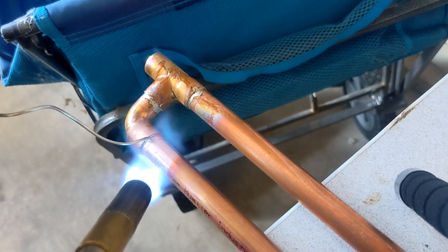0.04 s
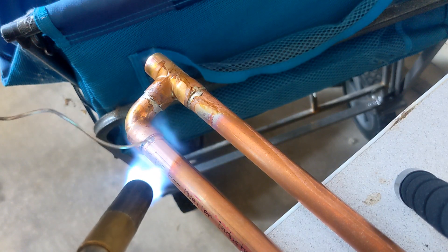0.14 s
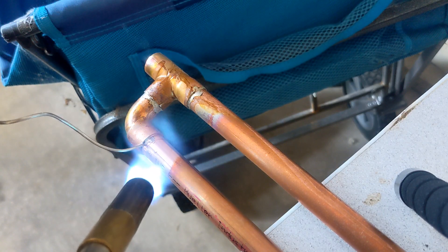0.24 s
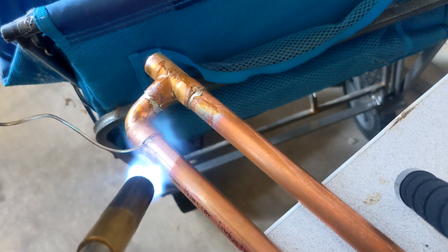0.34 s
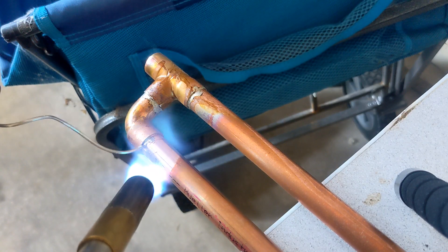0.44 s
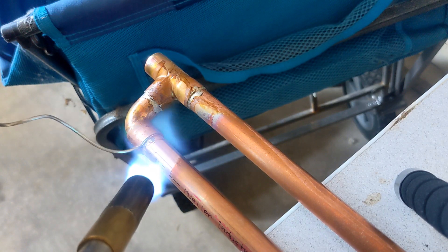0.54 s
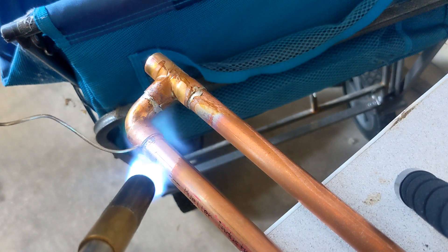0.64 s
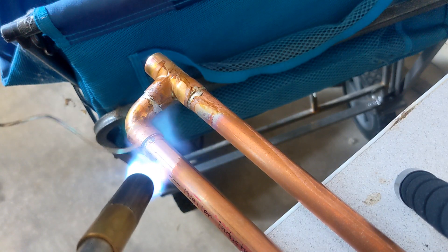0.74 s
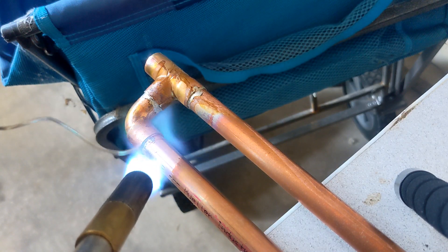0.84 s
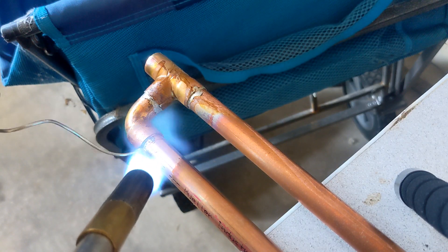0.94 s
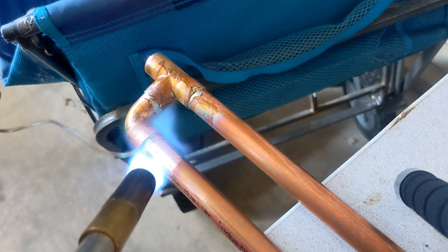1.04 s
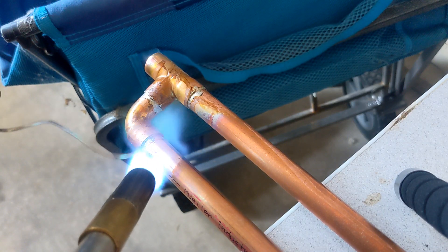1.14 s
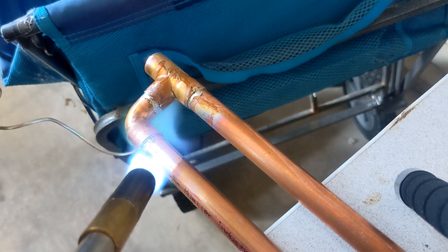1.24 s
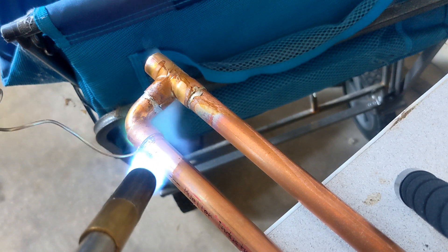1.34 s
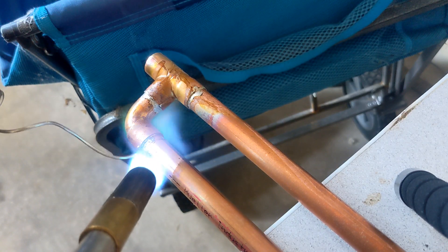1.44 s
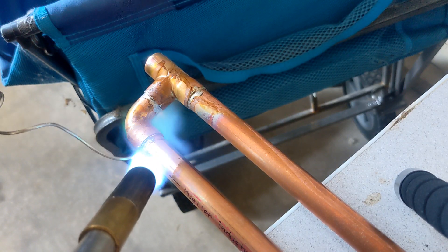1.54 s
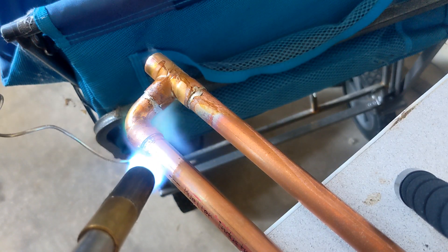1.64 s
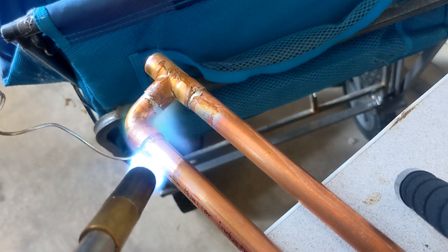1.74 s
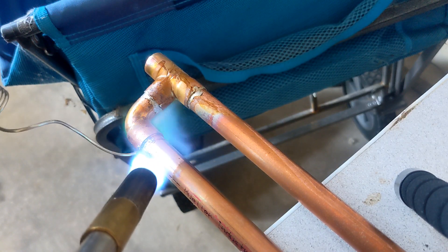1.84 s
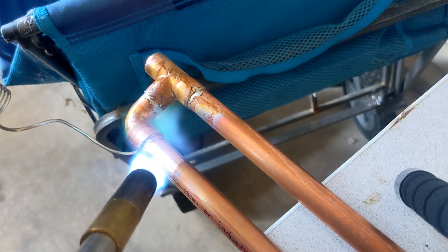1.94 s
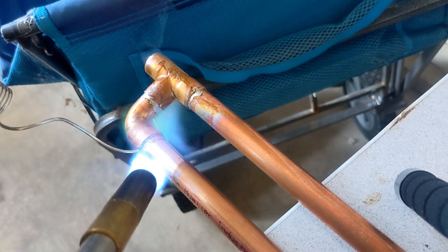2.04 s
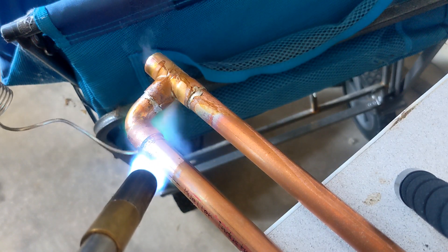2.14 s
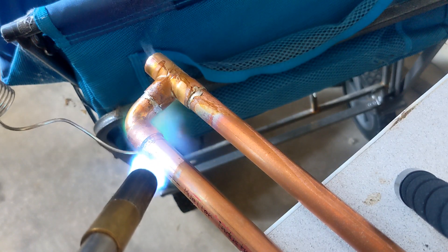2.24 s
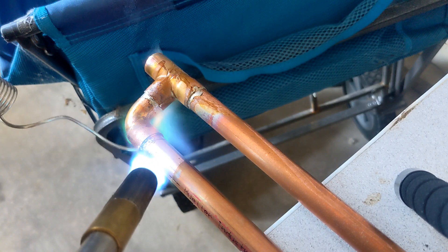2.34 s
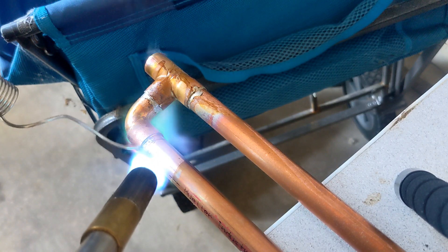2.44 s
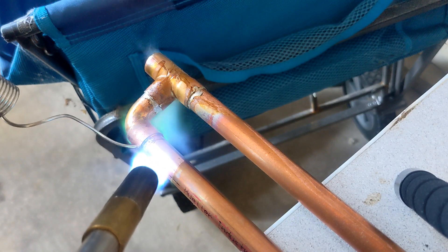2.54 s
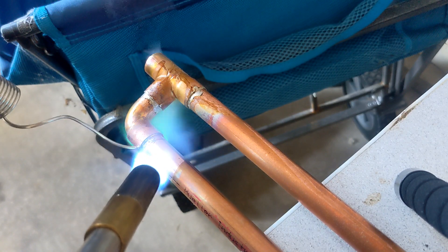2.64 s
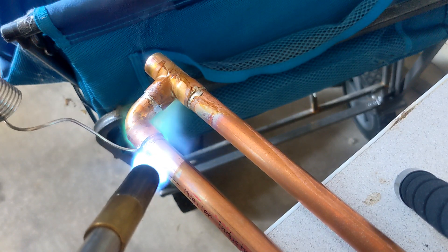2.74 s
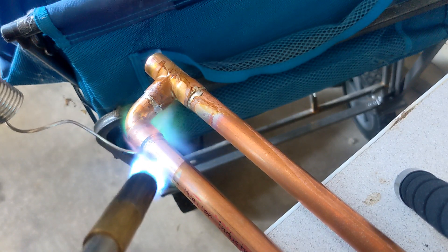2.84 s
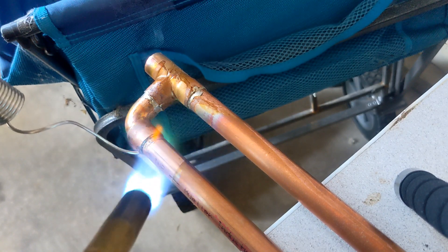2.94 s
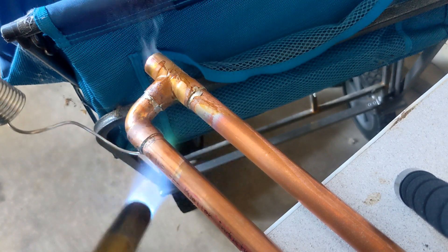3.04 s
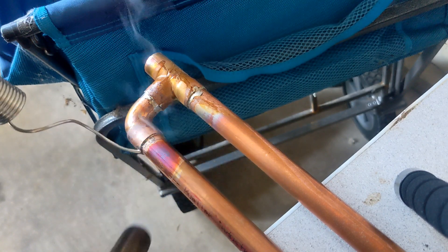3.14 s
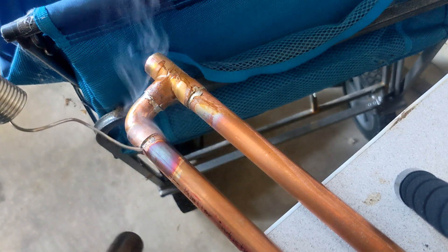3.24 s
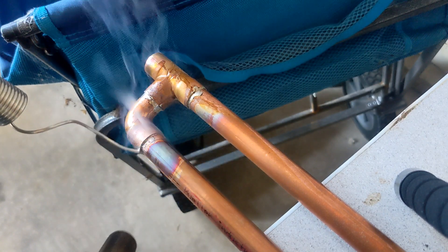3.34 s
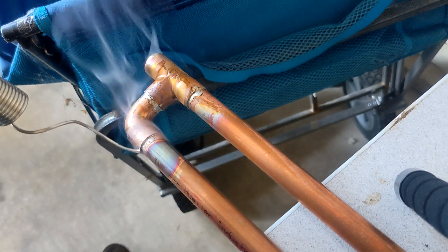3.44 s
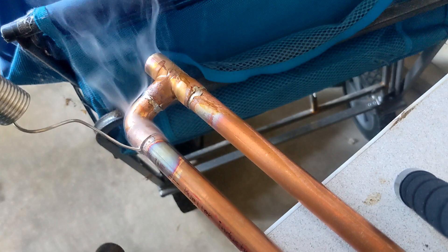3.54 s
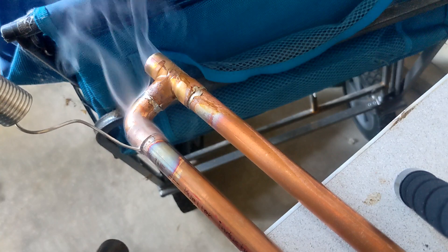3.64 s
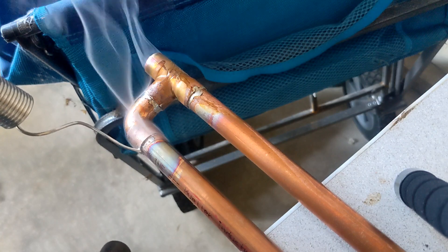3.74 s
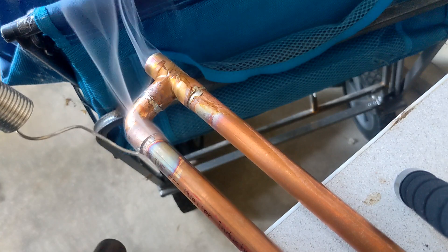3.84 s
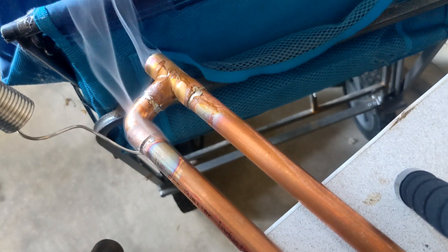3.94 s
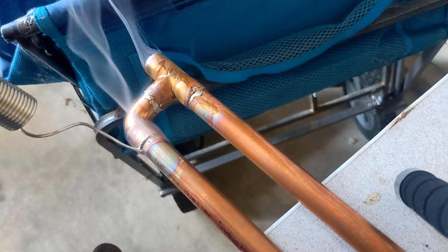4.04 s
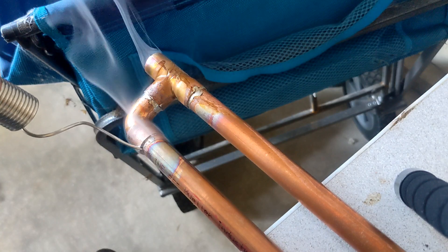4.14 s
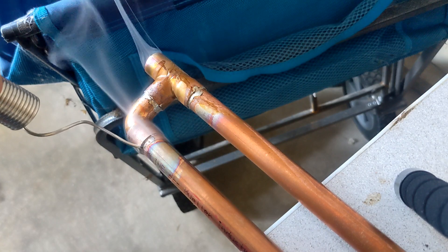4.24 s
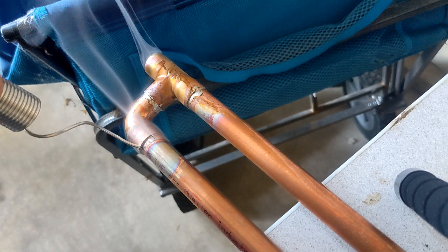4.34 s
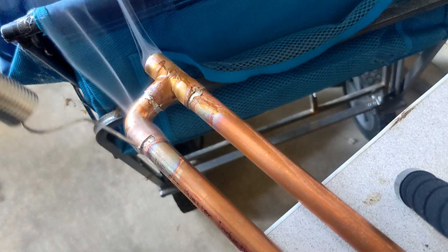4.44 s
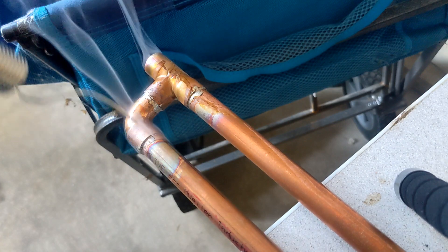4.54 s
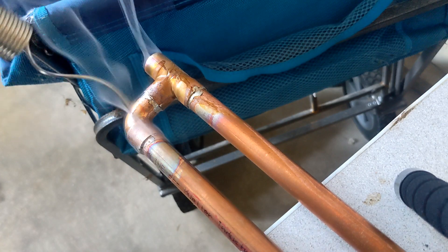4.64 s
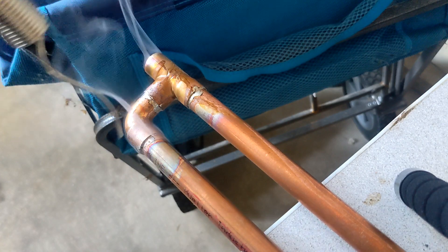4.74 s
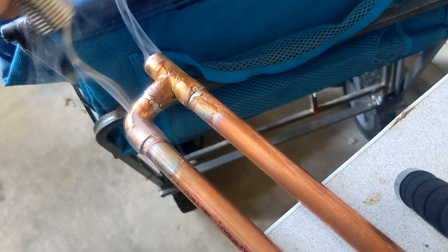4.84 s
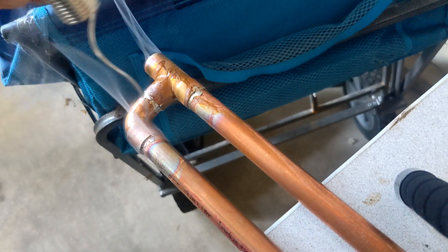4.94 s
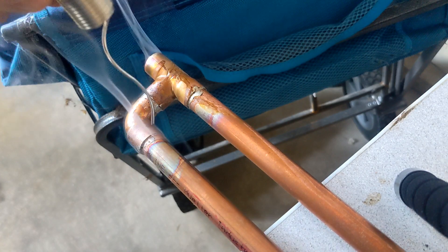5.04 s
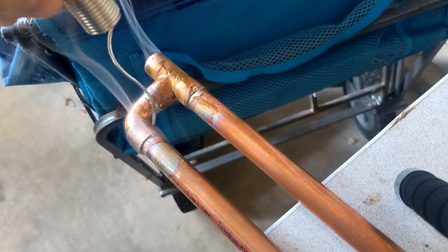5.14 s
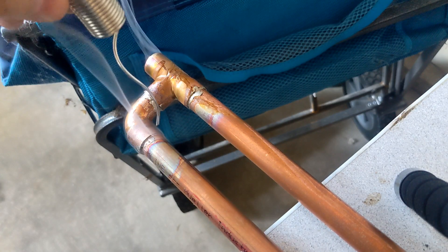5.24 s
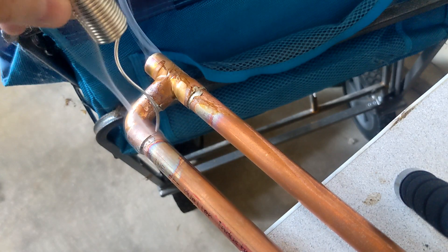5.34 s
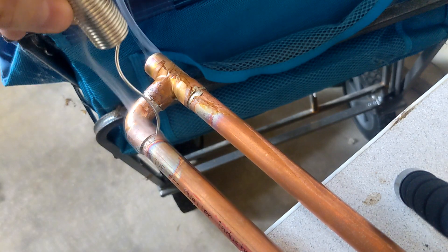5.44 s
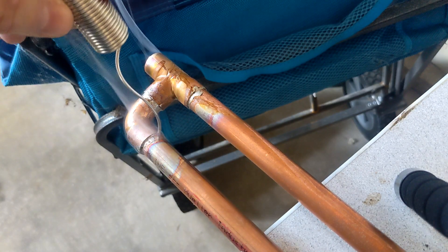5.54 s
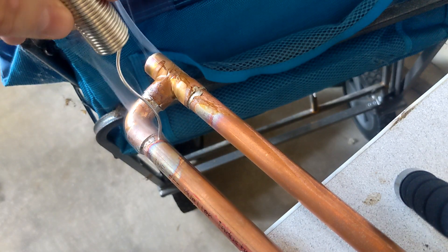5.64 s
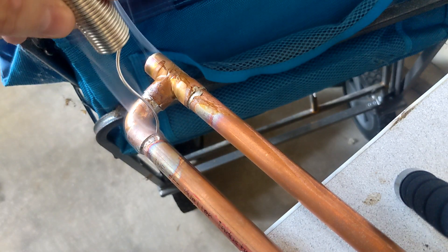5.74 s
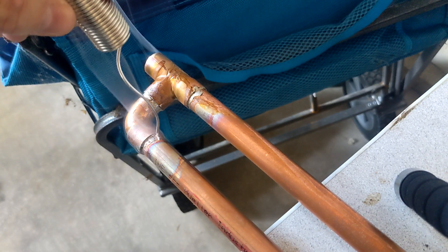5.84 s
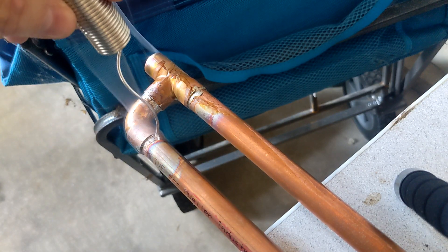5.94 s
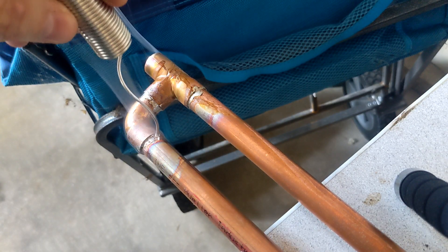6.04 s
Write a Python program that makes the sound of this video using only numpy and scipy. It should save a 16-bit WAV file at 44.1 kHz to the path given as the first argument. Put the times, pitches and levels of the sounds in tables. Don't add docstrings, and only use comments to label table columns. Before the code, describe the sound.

A handheld gas torch burns close to the microphone with a loud, rough, steady roar in a garage. After three seconds the gas dies away quickly with a small valve click, then two hard plastic trigger snaps follow, a thin spring ringing after them. Only a low compressor hum and faint room air remain, with one tiny tick of a wire spool near the end.

```python
import sys
import numpy as np
from scipy import signal
from scipy.fft import rfft, irfft, next_fast_len
from scipy.io import wavfile
from scipy.ndimage import uniform_filter1d

SR = 44100
rng = np.random.default_rng(int(sys.argv[2]) if len(sys.argv) > 2 else 0)


def undo_db(level):
    steps = np.asarray(level, float) / 20
    return 10 ** steps


def materialize(psi):
    bounded = np.clip(np.atleast_2d(psi).T, -1, 1)
    quanta = np.round(bounded * 32767).astype(np.int16)
    wavfile.write(sys.argv[1], SR, quanta)


N = 267907


def evened(x):
    return x / np.sqrt(np.mean(x ** 2) + 1e-20)


def read(points, hz):
    f, value = np.transpose(points)
    return np.interp(np.log(hz + 1), np.log(f + 1), value)


def drift(rate_hz, count):
    t = np.arange(0, N + 256, 256) / SR
    f = np.geomspace(rate_hz / 20, rate_hz, num=24)
    phase = rng.random((count, 24, 1))
    waves = np.sin(2 * np.pi * (f[:, None] * t + phase)) / np.sqrt(f)[:, None]
    slow = waves.sum(axis=1)
    return np.array([np.interp(np.arange(N) / SR, t, evened(v)) for v in slow])


def port_pair(noise, same, left_db, right_db, lead):
    shared, other = rfft(noise)
    same = np.clip(same, 0, 1)
    right = same * shared * np.exp(1j * lead) + np.sqrt(1 - same ** 2) * other
    return irfft(np.array([shared * undo_db(left_db), right * undo_db(right_db)]), noise.shape[1])[:, :N]


def colour_db(spectrum, peaks, hz):
    narrow_db = sum(db / (1 + (2 * (hz - f) / width) ** 2) ** 1.15 for f, width, db in peaks)
    return read(spectrum, hz) + narrow_db


def scatter(pair, wet_db, t60, dull_hz):
    taps = np.zeros((2, 22 * 600))
    at = np.arange(0, taps.shape[1], 22) + rng.integers(0, 22, (2, 600))
    np.put_along_axis(taps, at, rng.choice([-1., 1.], at.shape), axis=1)
    t = np.arange(taps.shape[1]) / SR
    taps = taps * undo_db(-60 * t / t60) * (t > .003)
    low = signal.lfilter(*signal.butter(1, 1500, fs=SR), taps)
    taps[1] += low[0] - low[1]
    taps = signal.lfilter(*signal.butter(1, min(dull_hz, SR / 2.2), fs=SR), taps)
    tail = taps / np.linalg.norm(taps[0])
    return pair + undo_db(wet_db) * signal.fftconvolve(pair, tail, axes=1)[:, :N]


def garage_air():
    # f/Hz, level per Hz/dB
    air_left = [(30, -83), (60, -68.5), (100, -69), (170, -65.5), (260, -70), (310, -87.5), (380, -74.5),
                (450, -80.5), (800, -84.5), (1600, -95), (4000, -107), (10500, -118), (13000, -118),
                (15200, -113)]
    air_right = [(30, -85.5), (60, -69.5), (100, -69), (170, -66.5), (260, -68), (310, -78), (400, -78.5),
                 (550, -81.5), (1250, -85.5), (1600, -95.5), (2300, -96.5), (4000, -104), (10500, -117),
                 (15700, -119)]
    # f/Hz, width/Hz, level/dB
    air_bands = [(200, 20, -5.5), (2200, 180, 6.5), (3140, 300, 2.5), (4320, 300, 1), (7190, 1200, 3),
                 (9000, 500, 2.5)]
    # f/Hz, likeness/0-1
    air_same = [(60, 1), (250, 0.95), (420, 1), (800, .5), (1300, 0.6), (2500, 0.6), (15000, 0.2)]
    # f/Hz, lead/radians
    air_lead = [(400, 0), (900, -2), (1500, -1.5), (3000, -2)]
    size = next_fast_len(N)
    hz = np.fft.rfftfreq(size, 1 / SR)
    noise = rng.standard_normal((2, size)) * np.sqrt(SR / 2)
    left_db = colour_db(air_left, air_bands, hz)
    right_db = colour_db(air_right, air_bands, hz)
    pair = port_pair(noise, read(air_same, hz), left_db, right_db, read(air_lead, hz))
    return undo_db(0.24 * drift(5.5, count=1)) * pair


def compressor_hum():
    tone_hz = [58, 76.7, 119.9, 239.9, 276.1, 360.7, 479.6, 599.6, 617, 632.9, 652, 719.6, 784.7, 839,
               992.6, 1232.5]
    # level/dB rms, left over right/dB, left lead/radians, wavering/dB
    tone_rows = [(-56.5, -2, 0, 5.5), (-60, -1.5, 0.097, 8.9), (-51, 0, 0.13, 1.7), (-47, -4, .1, 1.5),
                 (-69, 9.5, 0, 2.3), (-69.5, -3, 0.21, 5.2), (-68, -19, -.8, 6), (-49, -5, -0.69, 0.83),
                 (-57, -7, 0, 1.6), (-47, 0.5, 1.2, 1.3), (-74.5, 4, 0, 3), (-53.5, 3, -0.58, .8),
                 (-83, 9.5, 0, 2), (-77, 10, 0, 6.3), (-77.5, 6.5, 0, 3), (-73.5, 15, 0, 4)]
    t, out = np.arange(N) / SR, np.zeros((2, N))
    for hz, (db, pan_db, lead, waver_db) in zip(tone_hz, tone_rows):
        both, left, right, slip = drift(3, count=4)
        turn = 2 * np.pi * (hz * t + rng.random()) + .12 * waver_db * slip
        left_db = db + pan_db / 2 + waver_db * (both + 0.23 * left)
        right_db = db - pan_db / 2 + waver_db * (both + 0.36 * right)
        out[0] += undo_db(left_db) * np.sin(turn + lead)
        out[1] += undo_db(right_db) * np.sin(turn)
    return np.sqrt(2) * out


def spring():
    on_s, off_s = 3.277, 3.318
    level_db, start_db, swell_s = -44, -7, .03
    damp_db, damp_s, t60 = -12, .005, 0.59
    t = np.arange(N) / SR
    on, off = np.maximum(t - on_s, 0), np.maximum(t - off_s, 0)
    swell_db = start_db * np.exp(-(on / swell_s) ** 4)
    fade_db = damp_db * (1 - np.exp(-off / damp_s)) - 60 * off / t60
    tone = np.sin(2 * np.pi * 1265 * t + 1.8 * np.sin(2 * np.pi * 24 * t))
    return np.sqrt(2) * (on > 0) * undo_db(level_db + swell_db + fade_db) * tone


def trigger():
    # t/s, thud level/dB, crack level/dB, ring level/dB
    snaps = [
        [(3.2758, -23, -40.5, -30.5)],
        [(3.3251, -23, -32, -30.5), (3.3288, -40, -35, -38)],
        [(5.6128, -80, -61, -53), (5.6146, -80, -61, -53)],
        [(3.154, -63, -32.5, -70)],
    ]
    # f/Hz, level/dB, t60/s
    shell = [
        [(2260, -5, 0.017), (2610, -12, 0.055), (3640, -6, .018), (3740, -5, 0.028), (4050, -9, 0.013),
         (8500, -24, .007), (1170, -8, .015)],
        [(504, 8.5, 0.016), (1390, -2, .012), (3125, 0.5, 0.0096), (3900, -2, .006), (4660, 1, .006),
         (7020, -7, 0.0068), (8300, -5, 0.0077)],
        [(4700, 1, .006), (6100, 1, .007), (7100, 2, .007)],
    ]
    crack_centres = [4490, 5200, 6050, 10900]
    t, out = np.arange(6000) / SR, np.zeros((2, N + 6000))
    rings = [sum(undo_db(db - 60 * t / t60) * np.sin(2 * np.pi * hz * t) for hz, db, t60 in face)
             for face in shell]
    rings = rings * (1 - np.exp(-t / 0.00061))

    thud_hz = 140 + 110 * np.exp(-t / 0.024) + 400 * np.exp(-t / 0.0014)
    thud_fade = 0.46 * np.exp(-(t / 0.017) ** 2) + 0.32 * undo_db(-60 * t / 0.3)
    thud = np.sin(2 * np.pi * np.cumsum(thud_hz) / SR) * thud_fade
    thud = thud + 0.53 * np.sin(2 * np.pi * 85 * t) * undo_db(-60 * t / 0.089)
    burst = undo_db(-60 * t / 0.0076) + undo_db(-35 - 60 * t / .1)

    for body, hits in enumerate(snaps):
        crack_hz = crack_centres[body]
        ring = rings[body % len(shell)]
        band = signal.butter(2, [crack_hz * 0.25, min(crack_hz * 2.1, 20000)], "band", fs=SR)
        for s, thud_db, crack_db, ring_db in hits:
            crack = signal.lfilter(*band, rng.standard_normal((2, len(t)))) * burst
            snap = undo_db(thud_db) * thud + undo_db(crack_db) * crack + undo_db(ring_db) * ring
            at = round(s * SR)
            out[:, at:at + len(t)] += snap * undo_db([[-1.8], [1.8]])
    both = out[:, :N] + spring() * undo_db([[3.5], [-4.5]])
    return scatter(both, wet_db=-17.5, t60=0.18, dull_hz=4000)


def gas_flow(t, hz):
    # f/Hz, factor
    follow = [(150, .55), (350, 0.59), (700, 1.65), (2000, 1.2), (6000, 1.4), (15000, 2)]
    # f/Hz, level against the flame/dB
    tail_start = [(150, -9.5), (350, -15.5), (700, -20.5), (2000, -12), (6000, -20), (15000, -20.5)]
    shut_s, knee_s, empty_db_per_s, tail_db_per_s = 3.079, 0.072, 400, 101
    after = np.maximum(t - shut_s, 0)
    fall_db = -empty_db_per_s * (np.hypot(after, knee_s) - knee_s)
    gas_db = fall_db * read(follow, hz)[:, None]
    tail_db = read(tail_start, hz)[:, None] - tail_db_per_s * after
    return 10 * np.log10(undo_db(2 * gas_db) + undo_db(2 * tail_db))


def flame():
    # f/Hz, level per Hz/dB
    flame_left = [(40, -24.5), (70, -17.5), (130, -14), (220, -3), (400, -11), (750, 2.5), (1250, -1.4),
                  (2000, -5.5), (2800, -12.5), (4500, -23), (7500, -18), (10500, -39), (13000, -24),
                  (15700, -22.5)]
    flame_right = [(40, -23), (70, -15.5), (130, -12.5), (220, 1.35), (400, -5.5), (750, 2.5), (1250, 2),
                   (2000, -3.5), (2800, -13), (4500, -10.5), (7500, -8), (10500, -18), (13000, -15.5),
                   (15700, -21)]
    # f/Hz, width/Hz, level/dB
    near_left = [(552, 55, -7.1), (804, 35, -3.8), (936, 55, -5.9), (1068, 35, -4.2), (1284, 35, -4.9),
                 (1560, 80, -5.9), (1692, 200, -10.0), (1788, 80, -3.9), (2112, 55, -3.6), (2316, 80, 6.0),
                 (2550, 130, -5.6), (3150, 130, -5.5), (860, 40, 3.0), (3550, 320, 5.1), (325, 55, 4.5),
                 (4400, 200, 3.4), (4650, 200, 6.1), (4950, 130, 4.6), (5550, 500, -5.3), (6150, 200, -6.0),
                 (7000, 320, -3.8), (8550, 320, 4.0), (8900, 200, -3.3), (9200, 200, -5.0),
                 (9500, 200, 6.8), (10300, 320, 8.8), (10800, 320, -3.9), (11150, 320, -7.8),
                 (11600, 320, 4.4), (13250, 320, -4.4)]
    near_right = [(444, 35, 2.7), (492, 55, 5.0), (528, 35, 2.4), (564, 35, -3.8), (320, 45, 3.0),
                  (948, 80, -10.0), (1044, 35, -3.1), (1224, 80, 4.7), (1428, 35, 3.3), (1476, 35, -3.8),
                  (1548, 80, -6.3), (2172, 55, 3.2), (2292, 55, 4.9), (2550, 200, -4.1), (3100, 80, 3.1),
                  (3300, 320, 5.8), (3900, 200, -5.0), (5400, 130, -4.1), (5550, 130, -3.2),
                  (5700, 500, -9.6), (6000, 130, -5.7), (6550, 500, -8.3), (7150, 320, 4.0), (860, 40, 2.0),
                  (9050, 200, 6.6), (9450, 200, -4.7), (10600, 320, -3.2), (11450, 320, -4.7),
                  (12300, 320, -6.2), (13150, 320, -3.3)]
    # f/Hz, likeness/0-1
    flame_same = [(60, 0.92), (900, 0.98), (2200, 0.89), (2700, 0.26), (3350, 0.44), (4200, 0), (4900, 1),
                  (6300, 0.77), (6700, .2), (7500, 1), (8500, 0.7), (8900, 0.1), (12400, 0.5), (15200, .6)]
    # f/Hz, lead/radians
    flame_lead = [(40, -0.42), (800, -0.13), (1050, 0.44), (1600, 0.17), (1800, -1.68), (2100, -0.3),
                  (2400, -0.77), (3300, -2.02), (4400, 1.2), (6400, -3.5), (6900, 0.4), (8000, 0.3),
                  (8700, 2.5), (15700, 1.5)]
    port_gap_s, level_db = 0.00022, -17
    size = next_fast_len(N)
    hz, t, z = signal.stft(rng.standard_normal((2, size)), SR, nperseg=256, noverlap=192)
    patches = uniform_filter1d(rng.standard_normal(z.shape[1:]), size=6, axis=0)
    patches = evened(uniform_filter1d(patches, size=30, axis=1))
    flutter_db = patches * read([(200, 0.73), (2000, 0.49), (12000, .3)], hz)[:, None]
    z = z * undo_db(gas_flow(t, hz) + flutter_db)
    noise = signal.istft(z, SR, nperseg=256, noverlap=192)[1][:, :size]

    hz = np.fft.rfftfreq(size, 1 / SR)
    left_db = colour_db(flame_left, near_left, hz)
    right_db = colour_db(flame_right, near_right, hz)
    unlike = (1 - read(flame_same, hz)) / undo_db(.7 * (left_db - read(flame_left, hz)))
    lead = read(flame_lead, hz) + 2 * np.pi * hz * port_gap_s
    pair = port_pair(noise, 1 - unlike, left_db, right_db, lead)
    pair = scatter(pair, wet_db=-12.5, t60=0.21, dull_hz=15000)
    return undo_db(level_db) * pair / np.std(pair[:, :3 * SR])


def scene():
    return garage_air() + compressor_hum() + trigger() + flame()


def hide_faint_bands(x):
    # f/Hz, level per Hz/dB
    masked = [(1500, -90), (3300, -75), (6000, -79), (8500, -81), (9200, -81), (11000, -84), (13300, -81),
              (15200, -80)]
    masked_sum = [(2250, -80), (2550, -67.5), (2800, -68.5), (3050, -78), (13500, -86), (15000, -79),
                  (15400, -83)]
    lead = 381
    padded = np.pad(x, ((0, 0), (lead, 0)))
    hz, t, z = signal.stft(padded, SR, "cosine", nperseg=2048, noverlap=1024, scaling="psd")
    z = np.concatenate([z, z.mean(axis=0, keepdims=True)])
    band = np.arange(len(hz)) // 8
    power = np.add.reduceat(2 * abs(z) ** 2, np.arange(0, len(hz), 8), axis=1) / 8
    loud = power[:2].sum(axis=(0, 1)) * 8 * hz[1] > undo_db(2 * -24)
    wander = uniform_filter1d(rng.standard_normal(power.shape[1:]), size=2, axis=1)
    need_db = 2.2 * evened(wander)
    limit_db = np.array([read(m, hz) for m in (masked, masked, masked_sum)])[..., None] + need_db[band]
    dropped = loud & (power[:, band] < undo_db(2 * limit_db))
    kept = (z[:2] - z[2] * dropped[2]) * ~dropped[:2]
    y = signal.istft(kept, SR, "cosine", nperseg=2048, noverlap=1024, scaling="psd")[1]
    return y[:, lead:lead + N]


def roll_off(x):
    return signal.sosfilt(signal.butter(12, 15760, fs=SR, output="sos"), x)


def record(dry):
    cut = signal.sosfilt(signal.butter(4, 40, "high", fs=SR, output="sos"), dry)
    edge = signal.firwin(1023, 15740, window=("kaiser", 7), fs=SR)
    banded = signal.oaconvolve(cut, edge[None], "same")
    mix = hide_faint_bands(banded)
    return roll_off(mix)


dry = scene()
out = record(dry)
materialize(out)
```